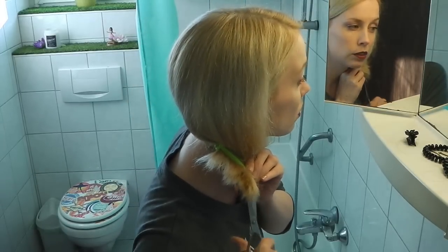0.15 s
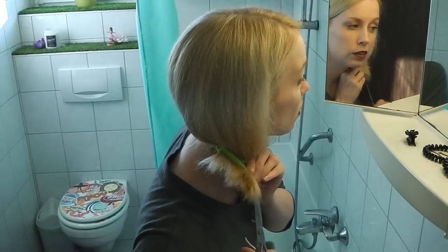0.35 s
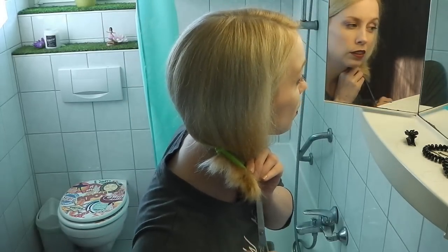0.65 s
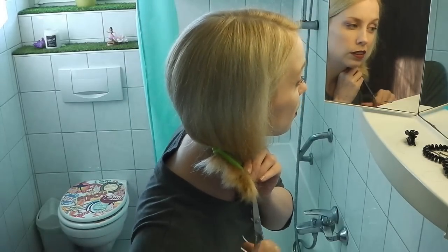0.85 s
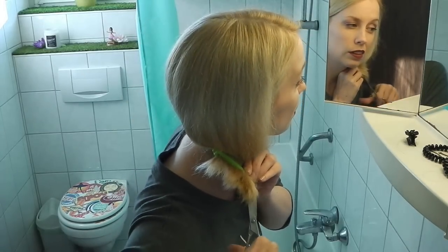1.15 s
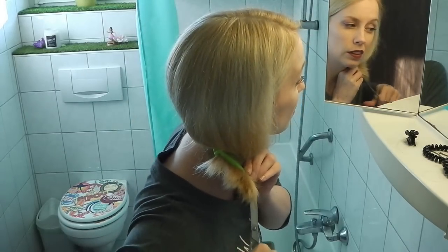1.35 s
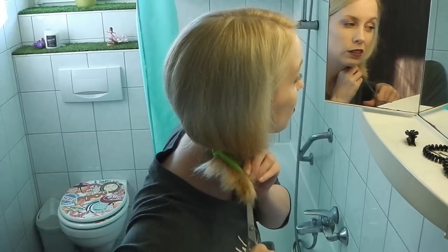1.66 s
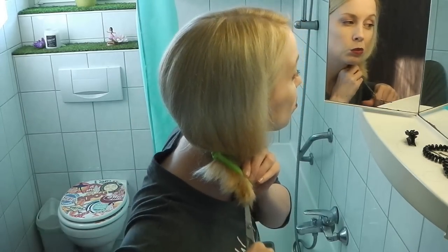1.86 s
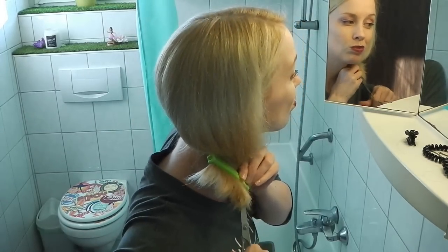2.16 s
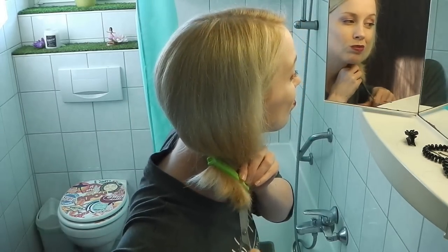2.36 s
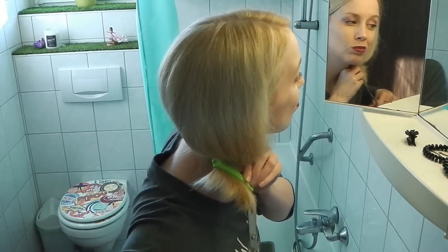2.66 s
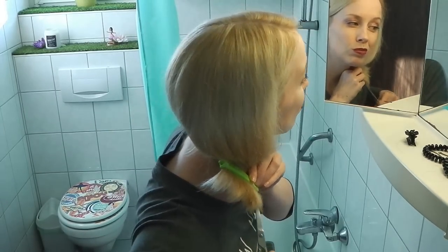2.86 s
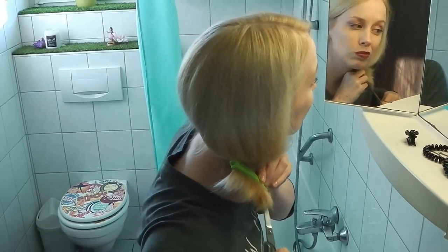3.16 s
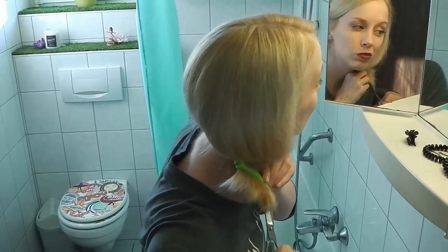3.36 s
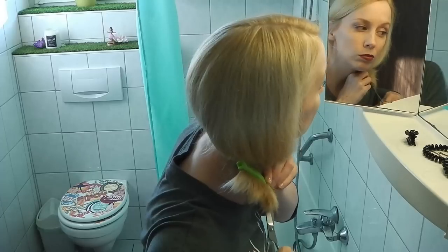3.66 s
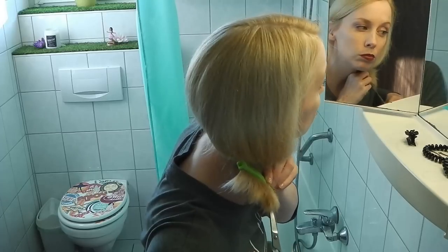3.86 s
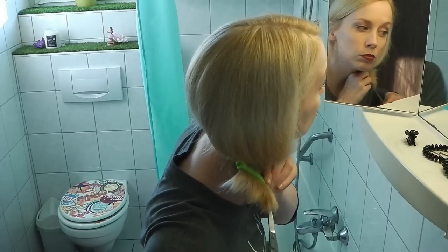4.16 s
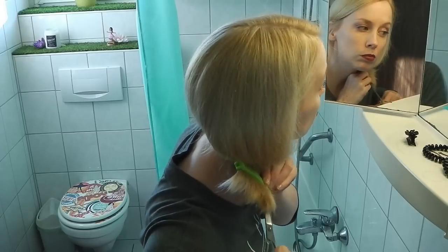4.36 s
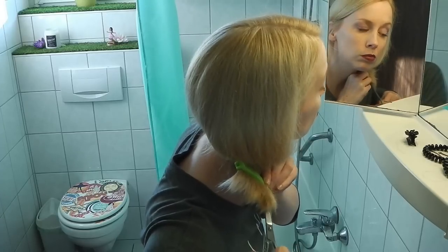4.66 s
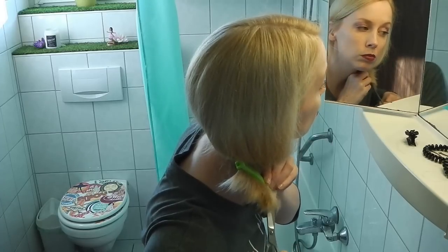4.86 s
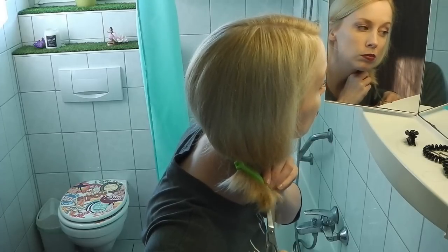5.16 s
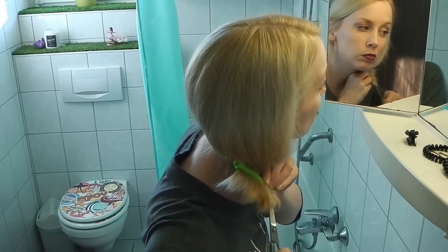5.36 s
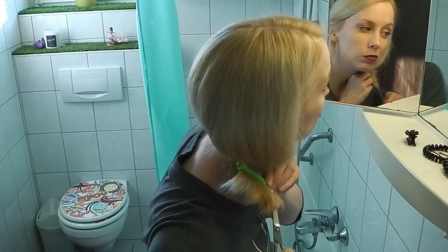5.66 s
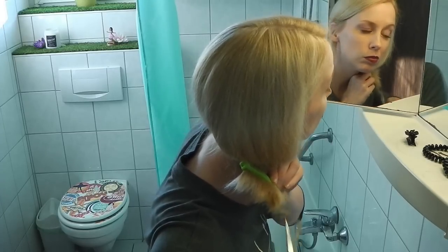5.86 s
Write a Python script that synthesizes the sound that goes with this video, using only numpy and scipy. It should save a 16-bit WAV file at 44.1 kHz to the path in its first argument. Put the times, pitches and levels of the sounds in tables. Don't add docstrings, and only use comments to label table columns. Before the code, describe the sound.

Close in a small tiled bathroom, scissors cut a bunch of hair about three times a second. Each stroke is a quick swelling crackle ended by a sharp steel clack, with a short bright echo. One early cut is nearly lost, then the snips grow firmer. Soft hollow taps on the camera body sit to the right in the first half, over low rumble and a faint vehicle drone.

```python
import sys
import numpy as np
from scipy import signal
from scipy.fft import rfft, irfft, next_fast_len
from scipy.io import wavfile
from scipy.ndimage import uniform_filter1d

SR = 44100
rng = np.random.default_rng(int(sys.argv[2]) if len(sys.argv) > 2 else 0)


def store_wav(level_fs):
    pcm = np.round(np.clip(np.atleast_2d(level_fs), -1, 1) * 32767)
    wavfile.write(sys.argv[1], SR, pcm.T.astype(np.int16))


def amplitude_ratio(level_db):
    exponent = np.asarray(level_db, float) / 20
    return 10 ** exponent


N = 265380
T = np.arange(N) / SR
SIZE = next_fast_len(N)
HZ = np.fft.rfftfreq(SIZE, 1 / SR) + 1e-3


def on_log(table, hz):
    table_hz, value = np.transpose(table)
    return np.interp(np.log(hz), np.log(np.maximum(table_hz, 1)), value)


def unit(x):
    return x / np.sqrt(np.mean(x ** 2))


def walk(rate_hz):
    hold = int(SR / rate_hz)
    steps = np.repeat(rng.standard_normal(N // hold + 1), hold)
    return uniform_filter1d(uniform_filter1d(steps, hold), hold)[:N]


def causal(gain_db, size):
    cepstrum = irfft(gain_db * np.log(10) / 20)
    cepstrum[1:size // 2] *= 2
    cepstrum[size // 2 + 1:] = 0
    return irfft(np.exp(rfft(cepstrum)))


def filtered(x, order, hz, kind):
    return signal.sosfilt(signal.butter(order, hz, kind, fs=SR, output="sos"), x)


def notch(hz):
    centre_hz, width_hz, depth_db = 7590, 368, -24.5
    return depth_db / (1 + ((hz - centre_hz) / width_hz) ** 2)


def ring(x, hz, width_hz):
    pole = np.exp((2j * np.pi * hz - np.pi * width_hz) / SR)
    return signal.lfilter([1], [1, -pole], x).imag


def mode_bank(x, modes):
    return sum(amplitude_ratio(level_db) * np.sqrt(width_hz / SR) * ring(x, hz, width_hz)
               for hz, width_hz, level_db in modes)


def clacks(count, spread_s):
    size = 256
    late = uniform_filter1d(rng.standard_normal((count, size // 2 + 1)), size=5, axis=1)
    late = size / 4 + np.clip(np.sqrt(5) * spread_s * SR * late, -size / 4, size / 2)
    return irfft(np.exp(-2j * np.pi * np.cumsum(late, axis=1) / size))


# shut_s [s], clack_db [dB], length_s [s], crackle_db [dB], treble_db [dB extra]
STROKES = [(.0246, -37, 0.14, -54.5, 1.5), (.3351, -37, 0.04, -51, 1), (.6446, -34.5, 0.043, -48.5, 1),
           (.9482, -44, .023, -64, -1), (1.3338, -71.5, 0.028, -69.5, 3.5), (1.6526, -39, 0.083, -51.5, 2),
           (1.9379, -35.5, 0.04, -51.5, -0.5), (2.272, -34.5, 0.053, -52.5, 4),
           (2.628, -48.5, 0.072, -45.5, 4), (2.9114, -33.5, 0.038, -42, 1),
           (3.2551, -33.5, 0.069, -45.5, -2.1), (3.5629, -34, 0.064, -44, 3), (3.8651, -37, 0.07, -43.5, 4),
           (4.1946, -34, 0.1, -47, -1), (4.4917, -29, 0.046, -41.5, -8.5), (4.7981, -28, .05, -46, -1.8),
           (5.1104, -30.5, 0.045, -44.5, -3.5), (5.4011, -31, 0.029, -42, -5.3),
           (5.7008, -43, 0.024, -55.5, 0.3)]
# start_s [s], level_db [dB]
REOPENINGS = [
    (0.214, -83),
    (1.798, -80),
    (2.429, -81),
    (3.145, -88),
    (4.985, -82.5),
]


def strokes(hairs_per_s, scatter_db, bunching_db, swell_db):
    after_s, after_db = 0.0072, -4.5
    tip_db, tip_db_per_crackle_db, firm_crackle_db = -6, -0.5, -62.5
    grip_db, grip_db_per_crackle_db = -10.5, 0.37
    clack_treble_db = 6

    hairs = (rng.random(N) < hairs_per_s / SR) * rng.choice([-1, 1], N)
    hairs = hairs * amplitude_ratio(scatter_db * rng.exponential(size=N))
    hairs = unit(hairs * amplitude_ratio(bunching_db * walk(550)))
    rows = STROKES + [(start_s, -99, .02, level_db, -12) for start_s, level_db in REOPENINGS]
    knocks = clacks(count=len(rows), spread_s=0.000661)
    out = np.zeros((4, N))
    for (shut_s, clack_db, length_s, crackle_db, treble_db), knock in zip(rows, knocks):
        shut = int(shut_s * SR) - len(knock) // 4
        near = slice(max(shut - 9000, 0), shut + 2000)
        left = (shut_s - T[near]) / length_s
        cut = np.clip(4 * (1.2 - left), 0, 1) * amplitude_ratio(crackle_db - swell_db * np.clip(left, 0, 2) ** 2.95)
        tearing = amplitude_ratio(after_db) * np.exp(np.minimum(shut_s - T[near], 0) / after_s)
        cut = cut * np.where(left < 0, tearing, 1)

        ring_db = tip_db + np.minimum(tip_db_per_crackle_db * (crackle_db - firm_crackle_db), 5)
        grip = amplitude_ratio(grip_db) * amplitude_ratio(grip_db_per_crackle_db * (crackle_db + 41))
        share = np.array([[1], [amplitude_ratio(treble_db) - 1], [amplitude_ratio(ring_db)], [grip]])
        clack_share = share + [[0], [amplitude_ratio(clack_treble_db) - 1], [0], [4 * grip]]
        out[:, near] += share * cut * hairs[near]
        out[:, shut:shut + len(knock)] += clack_share * amplitude_ratio(clack_db + 23.0) * knock
    return out


def patches(x, depth_db, rate_hz):
    spectrum = rfft(x, SIZE)
    centres_hz = 1500 * 2 ** np.arange(0, 4, .5)
    place = np.log2(np.clip(HZ, centres_hz[0], centres_hz[-1]))
    out = 0
    for centre_hz in centres_hz:
        band = np.cos(np.pi * np.clip(place - np.log2(centre_hz), -.5, .5)) ** 2
        out = out + irfft(spectrum * band, SIZE)[:N] * amplitude_ratio(depth_db * walk(rate_hz))
    return out


# pitch_hz [Hz], level_db [dB per Hz]
STEEL_COLOUR = [(350, -75.5), (600, -51), (1000, -49.5), (1400, -35.5), (1900, -7.5), (2500, 12.5),
                (3400, 3.5), (5000, 4.5), (6900, 1.5), (9300, 7.5), (11000, 7), (13700, 6.5), (15600, 1.5)]
# pitch_hz [Hz], width_hz [Hz], level_db [dB]
BLADE_MODES = [(2582, 248, -2.5), (9980, 300, -7), (13300, 8500, 3.5)]
# pitch_hz [Hz], width_hz [Hz], level_db [dB]
BLADE_RINGS = [(2455, 23, -6), (2657, 17.3, -11), (3027, 32, -15.5), (3400, 13, -16), (4365, 43, -22),
               (4790, 48, -15.5), (5366, 120, -7), (9630, 150, -14.5)]
# pitch_hz [Hz], width_hz [Hz], level_db [dB]
HANDLE_MODES = [(799, 35, -16.5), (1477, 59, -22.5)]


def scissors():
    size = 1024
    hz = np.fft.rfftfreq(size, 1 / SR) + 1
    full, treble, tips, grip = strokes(hairs_per_s=9700, scatter_db=2.5, bunching_db=3.5, swell_db=27.0)
    full = full + filtered(treble, 4, 10680, "high")
    colour = causal(on_log(STEEL_COLOUR, hz) + notch(hz), size)
    snaps = signal.fftconvolve(full, colour / np.linalg.norm(colour))[:N]

    modes = mode_bank(full, BLADE_MODES + BLADE_RINGS)
    modes = modes + mode_bank(tips, [(5050, 550, -1.5)])
    modes = filtered(modes, 4, 1900, "high")
    hollow = filtered(mode_bank(grip, HANDLE_MODES), 3, [700, 1600], "band")
    return patches(snaps + modes, depth_db=3.5, rate_hz=99) + amplitude_ratio(-1.5) * hollow


# pitch_hz [Hz], t60_s [s]
TILE_DECAY = [(600, 0.074), (1000, 0.18), (1900, 0.32), (2500, 0.29), (4200, 0.25), (11000, 0.21),
              (16000, 0.13)]
WALL_S = [.0043, .0089, .0131]
# left_db [dB], right_db [dB]
WALL_DB = [(-6, -2.5), (-15.5, -10), (0.5, -20.5)]
# pitch_hz [Hz], left_minus_right_db [dB]
BALANCE = [(60, -3), (110, 11.5), (200, 14), (380, 22), (700, -1), (1290, 3.5), (2380, 3.5), (4400, 3),
           (8120, -1), (15000, -3.5)]


def bathroom(x, wet_db, build_s):
    size = 2 ** 14
    alike, lag_s = 0.47, 5e-5
    t, hz = np.arange(size) / SR, np.fft.rfftfreq(size, 1 / SR) + 1
    noise = rfft(rng.standard_normal((2, 2, size)))
    common = noise[:, 0] * np.exp(2j * np.pi * hz * lag_s)
    noise[:, 1] = alike * common + np.sqrt(1 - alike ** 2) * noise[:, 1]
    tail = 0
    for centre_hz in 500 * 2 ** np.arange(0, 5.6, .5):
        band = irfft(noise * np.cos(np.pi * np.clip(np.log2(hz / centre_hz), -.5, .5)) ** 2)
        tail = tail + band * 1000. ** (-t / on_log(TILE_DECAY, centre_hz))
    tail *= amplitude_ratio(wet_db) * (1 - np.exp(-t / build_s)) ** 2

    early = np.zeros((2, size))
    early[[0, 1], [1, 0]] = 1
    for delay_s, (left_db, right_db) in zip(WALL_S, WALL_DB):
        early[[0, 1], int(delay_s * SR) + np.array([0, 3])] += amplitude_ratio(np.array([left_db, right_db]))

    place = 2 * np.pi * 1.1 * T
    sends = x * np.array([np.ones(N), np.cos(place), np.sin(place)])
    both = signal.fftconvolve(sends[:, None], np.array([early, *tail]), axes=2).sum(axis=0)[:, :N]
    balance = amplitude_ratio(np.outer([.5, -.5], on_log(BALANCE, HZ)))
    return irfft(rfft(both, SIZE) * balance, SIZE)[:, :N]


# start_s [s], pitch_hz [Hz], level_db [dB]
ENGINE_LINE = [(0, 60.2, -77), (.2, 59.7, -73), (.6, 60.1, -67), (.9, 58.3, -89), (1.298, 60.5, -83.5),
               (1.502, 60, -59.5), (1.752, 59, -92), (2.402, 52.1, -71), (2.622, 50.6, -69),
               (3.45, 50.2, -76), (3.59, 50.6, -62), (3.77, 50.7, -71), (3.9, 50.2, -55.5),
               (4.1, 50.7, -58), (4.498, 53.85, -57), (4.818, 60.26, -63.5), (5.19, 62, -59),
               (5.6, 63.3, -88)]


def vehicle():
    boom_hz, boom_width_hz, boom_db = 119, 5, -8
    start_s, pitch_hz, level_db = np.transpose(ENGINE_LINE)
    hz, db = np.interp(T, start_s, pitch_hz), np.interp(T, start_s, level_db)
    phase = 2 * np.pi * np.cumsum(hz) / SR + np.array([[0], [.7]])
    heard = np.clip((start_s[-1] - T) / 0.14, 0, 1)
    boom = amplitude_ratio(boom_db + 8.4 * walk(6)) / (1 + ((2 * hz - boom_hz) / boom_width_hz) ** 2)
    drone = np.sin(phase) * amplitude_ratio(6.1 * walk(12)) + boom * np.sin(2 * phase)
    return np.sqrt(2) * heard * amplitude_ratio(db + np.array([[-1.5], [1.5]])) * drone


# pitch_hz [Hz], level_db [dB per Hz]
RUMBLE = [(15, -59), (30, -19.5), (50, 7), (120, 6), (190, 3), (260, 3.5), (330, -7.5), (450, -40.5),
          (600, -25), (1200, -85)]
# start_s [s, moment of the peak], rise_s [s], fall_s [s], level_db [dB over rumble]
HOUSE_BUMPS = [
    (1.129, 0.024, 0.042, 15.5),
    (1.3, 0.19, 0.095, 9.5),
    (1.4, 0.07, 0.15, 21.5),
    (2.259, 0.047, 0.082, 12.5),
    (4.17, .05, 0.06, 6),
    (5.85, 0.14, 0.2, 3),
]
# pitch_hz [Hz], width_hz [Hz], level_db [dB]
HOUSE_MODES = [(118.5, 13, -72.5), (156.3, 4.7, -70)]
# pitch_hz [Hz], level_db [dB per Hz]
MIC_HISS = [(250, -9), (400, -6.5), (650, -10.5), (1000, -24), (1500, -9.5), (2300, -7.5), (3200, -11),
            (5000, -13), (7000, -15), (9500, -21), (13000, -32), (16000, -38.5)]


def floor():
    deep_db, upper_db, upper_fade_db_per_s, swell_db, hiss_db = -65.5, -70.5, -0.2, 3, -70.5
    white = rfft(rng.standard_normal((2, 2, SIZE)))
    house = white[0] * amplitude_ratio(on_log(RUMBLE, HZ))
    upper = 1 / (1 + (185 / HZ) ** 8)
    bump_db = sum(np.interp(T, [start_s - rise_s, start_s, start_s + fall_s], [0, level_db, 0])
                  for start_s, rise_s, fall_s, level_db in HOUSE_BUMPS)
    deep = unit(irfft(house * (1 - upper), SIZE)[:, :N])
    deep = deep * amplitude_ratio(deep_db + swell_db * walk(5.6) + 0.25 * bump_db)
    drone = unit(irfft(house * upper, SIZE)[:, :N])
    drone = drone * amplitude_ratio(upper_db + upper_fade_db_per_s * T + swell_db * walk(7) + bump_db)
    modes = sum(amplitude_ratio(level_db) * unit(ring(rng.standard_normal((2, N)), hz, width_hz))
                for hz, width_hz, level_db in HOUSE_MODES)
    hiss = unit(irfft(white[1] * amplitude_ratio(on_log(MIC_HISS, HZ) + .5 * notch(HZ)), SIZE)[:, :N])
    return deep + drone + modes + hiss * amplitude_ratio(hiss_db + 3.5 + 0.98 * walk(27))


# start_s [s], level_db [dB peak], pitch_hz [Hz]
BODY_TAPS = [(0.019, -60.5, 443), (.325, -64, 470), (0.369, -61.5, 443), (0.433, -63.5, 462),
             (0.503, -61.5, 459), (.567, -65.5, 442), (0.636, -63.5, 448), (0.787, -58.5, 418),
             (.831, -51, 452), (0.951, -61, 438), (1.02, -60.5, 427), (1.122, -64.5, 448),
             (1.196, -59, 455), (1.331, -54, 457), (1.393, -59.5, 440), (1.472, -60, 450),
             (1.647, -59.5, 436), (1.761, -70, 470), (1.832, -58, 456), (1.889, -69.5, 443),
             (2.323, -65, 419), (2.556, -64.5, 434)]


def camera_taps(width_hz, soft_s):
    side_db = np.array([[-15], [0]])
    out = np.zeros((2, N))
    for (start_s, level_db, pitch_hz), beat in zip(BODY_TAPS, rng.random((len(BODY_TAPS), 1))):
        near = slice(max(int(start_s * SR) - 400, 0), int(start_s * SR) + 6000)
        age_s = np.maximum(T[near] - start_s + 0.007, 0)
        push = (1 - np.exp(-age_s / soft_s)) ** 2 * np.exp(-np.pi * width_hz * age_s)
        pair = np.sin(2 * np.pi * pitch_hz * age_s)
        pair = pair + 0.48 * np.sin(2 * np.pi * (.9 * pitch_hz * age_s + beat))
        out[:, near] += amplitude_ratio(level_db + 18 + side_db) * push * pair
    return out


def scene():
    snips = bathroom(scissors(), wet_db=-23.5, build_s=0.0023)
    return snips + camera_taps(width_hz=20.3, soft_s=0.0088) + vehicle() + floor()


# pitch_hz [Hz], threshold_db [dB over usual level]
LINE_GATE = [(200, -25), (330, 4), (700, 9), (1100, 14), (1650, 9), (2100, -5), (6500, -5), (7800, 7),
             (9000, -2), (12000, 2), (14500, 7), (16000, 16)]


def thin_out(x, follow, patchy_db):
    top_hz = 15900
    hz, _, z = signal.stft(x, SR, "cosine", 2048, 1024)
    power = np.abs(z) ** 2 + 1e-20
    usual = uniform_filter1d(np.median(power, axis=2), size=15, axis=1)[..., None]
    total = power[:, hz > 2000].sum(axis=1)[:, None]
    lift = (total / np.median(total)) ** (follow + 0.043 * (hz < 1800))[:, None]
    threshold = usual * amplitude_ratio(2 * on_log(LINE_GATE, hz + 1))[:, None] * lift
    patchy = np.repeat(rng.standard_normal((2, 129, z.shape[2])), 8, axis=1)[:, :len(hz)]
    threshold = threshold * amplitude_ratio(patchy_db * patchy)
    kept = (hz < top_hz)[:, None] / (1 + (threshold / power) ** 8)
    return signal.istft(z * kept, SR, "cosine", 2048, 1024)[1][:, :N]


def top_cut(x):
    return signal.sosfilt(signal.butter(12, 16650, fs=SR, output="sos"), x)


def record(dry):
    mix = thin_out(dry, follow=0.21, patchy_db=18.0) - 0.00032
    return top_cut(mix)


dry = scene()
out = record(dry)
store_wav(out)
```